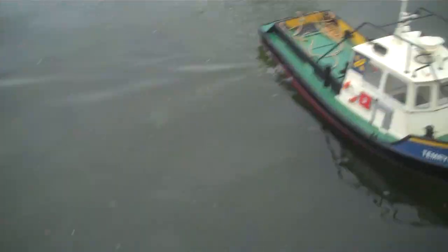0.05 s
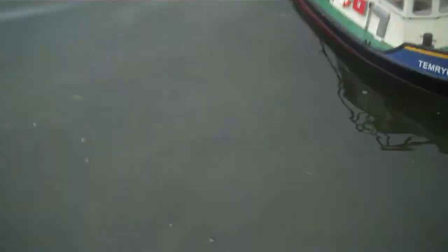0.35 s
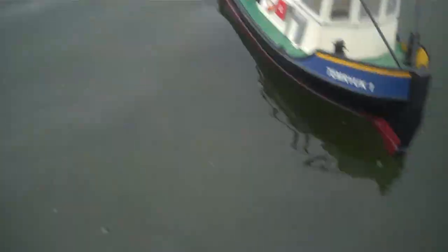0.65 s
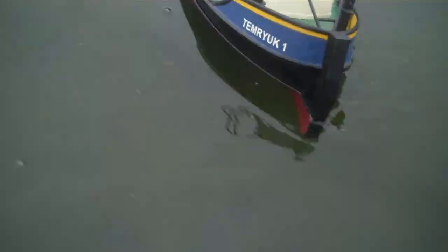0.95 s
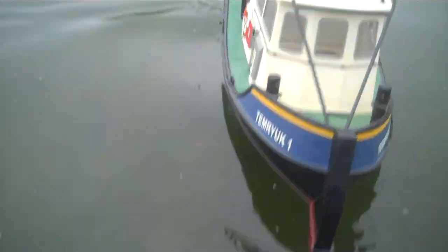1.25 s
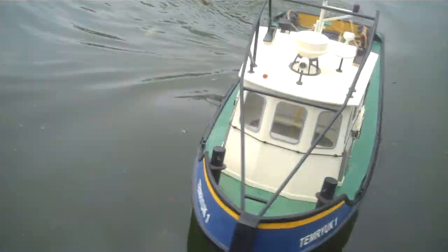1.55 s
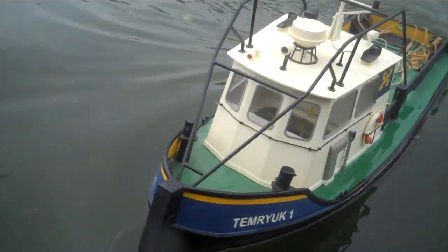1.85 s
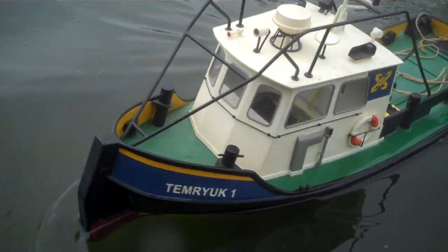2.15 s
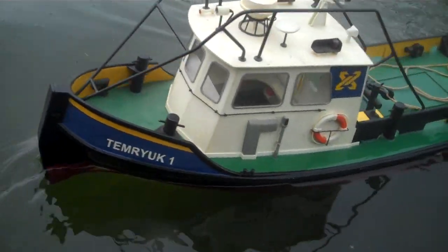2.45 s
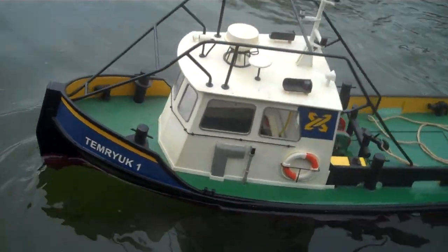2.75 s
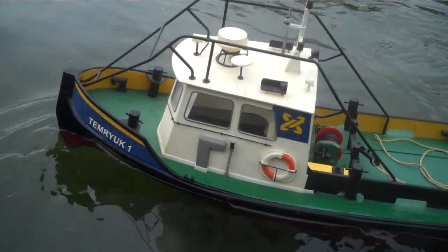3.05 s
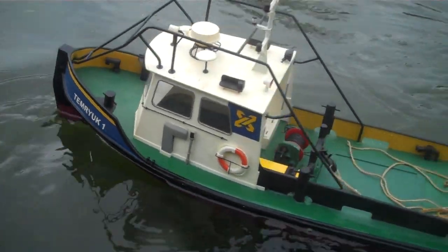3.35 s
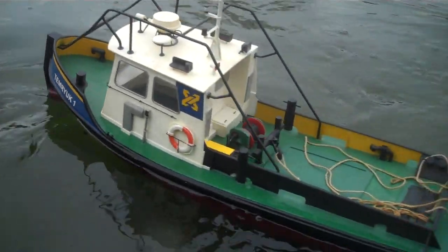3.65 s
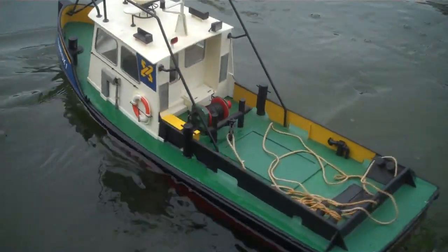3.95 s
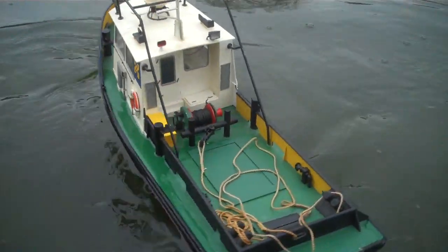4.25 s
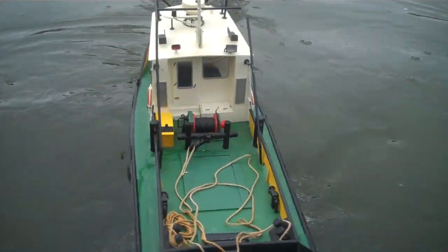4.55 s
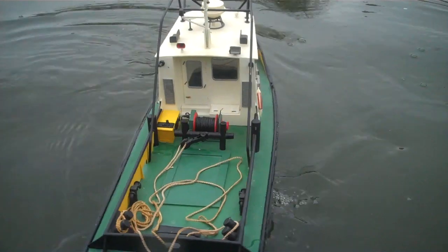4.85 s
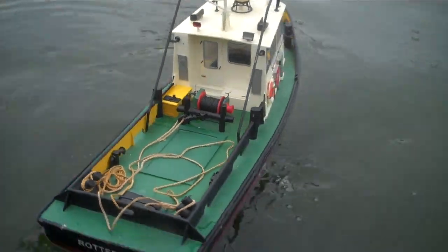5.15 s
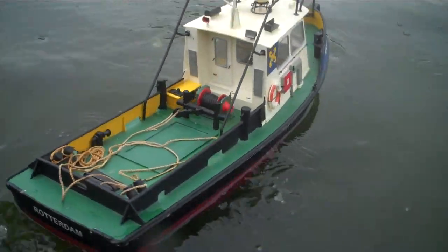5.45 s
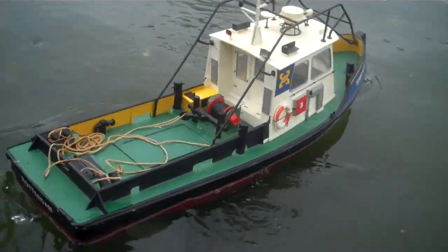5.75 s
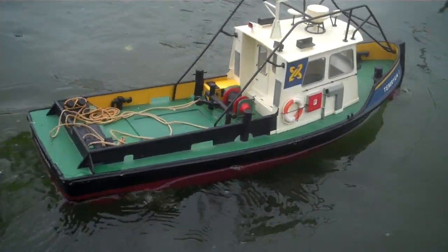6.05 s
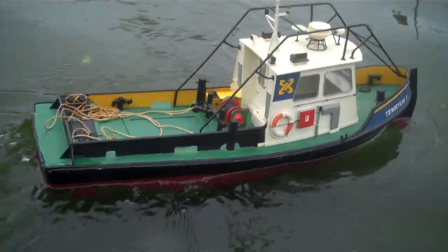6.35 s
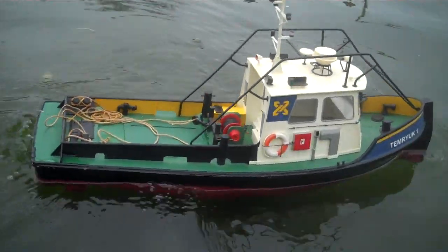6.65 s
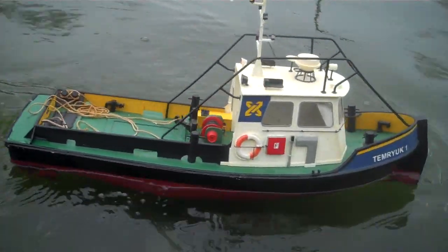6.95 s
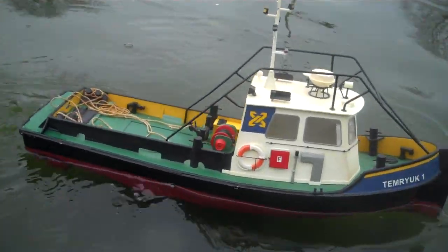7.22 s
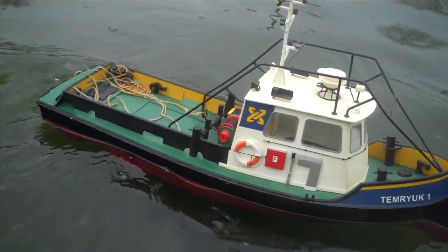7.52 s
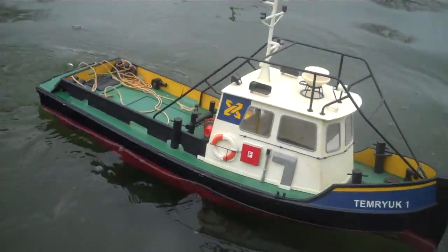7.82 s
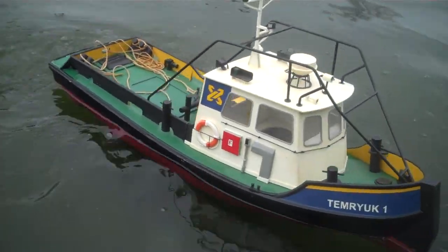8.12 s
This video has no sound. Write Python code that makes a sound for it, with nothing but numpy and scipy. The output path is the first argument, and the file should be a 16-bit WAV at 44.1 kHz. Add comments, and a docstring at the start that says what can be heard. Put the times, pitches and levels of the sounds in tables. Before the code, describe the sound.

A model tugboat runs close to a hand-held microphone on a lake for about eight seconds. Its electric motor hums faintly beneath a fast, ringing shaft rattle, hissing gears and a chattering dry bearing. The speed creeps up slightly and the tone shifts as the boat turns. During the first 1.5 seconds a hand rubs and bumps the microphone, with soft wind puffs and one hard crack at 0.3 seconds, the loudest moment. A brief swishing rub comes at 2.6 seconds. The shaft gives sharper slaps around 2.6 to 3.3 seconds and again from 6.2 to 6.5, and the bearing pings now and then. Handling knocks cluster at 3.7 to 3.9 seconds and at 4.6. Sharp drip-like ticks stand out near 4.3 and 5.7 seconds. A soft, low finger judder starts around 7.8 seconds. Quiet open air lies underneath throughout.

```python
"""A model tugboat circles on a lake, close to a hand-held camera.
Its electric motor hums and turns a rattling propeller shaft, which beats twice a turn and rings the
hull, deck and cabin; brushes and gears hiss, a dry bearing chatters. The tone shifts as the boat turns.
A hand rubs and knocks on the camera case, wind puffs on its two microphone ports, and a few drops
tick on the water, all over a low bed of open air."""
import sys
import numpy as np
from scipy import signal
from scipy.fft import rfft, irfft, next_fast_len
from scipy.io import wavfile
from scipy.ndimage import uniform_filter1d

SR = 44100
rng = np.random.default_rng(int(sys.argv[2]) if len(sys.argv) > 2 else 0)


def int16_out(signal):
    """Quantize to a 16-bit WAV file."""
    q = np.round(np.clip(np.atleast_2d(signal).T, -1, 1) * 32767)
    wavfile.write(sys.argv[1], SR, q.astype(np.int16))


N = 365148
TIME = np.arange(N) / SR

# tone of the air bed and of the wind puffs: freq_hz, gain_db
AIR_COLOUR = [(10, 2.5), (30, -3), (60, -5), (100, -11.5), (140, -8), (250, -15.5), (500, 1.5), (900, -19),
              (2000, -48), (6000, -18.5), (14000, -54)]
GUST_COLOUR = [(8, -3), (25, 0), (50, -3), (100, -14), (300, -21), (600, -50), (2000, -80)]
# wind puffs on the ports: start_s, length_s, level_db
GUSTS = [(.19, 0.13, -39.5), (.35, .08, -37), (.57, .13, -41), (.72, .06, -41), (.83, .09, -46),
         (.99, 0.095, -43.5), (1.27, 0.1, -44.5), (2.6, .07, -41)]
# sharp ticks of drops and of the case: start_s, level_db, centre_hz, width_hz, t60_s
TICKS = [(0.3418, -17, 7940, 5000, 0.015), (2.596, -29, 6650, 4000, 0.021), (2.643, -27, 4970, 4000, 0.026),
         (3.74, -24, 1500, 2200, .008), (3.746, -28, 2700, 400, .02), (3.793, -29, 1900, 1600, 0.011),
         (3.799, -27, 2500, 900, 0.051), (3.924, -28, 6940, 5000, .004), (1.689, -27, 4960, 400, 0.016),
         (4.917, -27, 5000, 4000, .006), (5.685, -18.5, 3620, 600, .02), (4.3246, -18, 4130, 1300, 0.019),
         (4.611, -24, 5900, 4000, 0.0055), (5.6853, -14, 5930, 2300, 0.012),
         (5.701, -24, 5430, 3500, 0.035), (5.718, -33, 6350, 4970, 0.079)]

# hand moves (slides, squeezes, one quick flick): start_s, length_s, level_db
RUBS = [(0, 0.29, -33), (.1, 0.14, -33), (.24, 0.14, -31), (.5, 0.18, -39.5), (.66, 0.11, -39),
        (.78, 0.38, -39), (1.22, 0.12, -44), (2.583, 0.079, -33.5), (3.66, 0.15, -44)]
GRIPS = [(0, 1.16, -37), (.19, 0.14, -62), (.54, 0.096, -38), (.82, 0.29, -45.5), (1.22, 0.26, -61),
         (2.56, 0.1, -38.5)]
FLICK = [(2.579, .088, -34.5)]
# tone of each kind of move: freq_hz, gain_db
RUB_COLOUR = [(200, -39), (450, 15), (850, 7.5), (1250, 6), (1800, 10), (2600, 7.5), (3500, -3),
              (4100, 7.5), (4900, 1), (5500, 0), (6100, 1), (7500, 0), (8700, -10), (9600, -9),
              (14000, -26)]
GRIP_COLOUR = [(10, 8), (35, 4), (70, 1.5), (150, 0), (280, 1), (430, 7.5), (580, -30), (900, -11),
               (3000, -60)]
FLICK_COLOUR = [(2000, -18), (3000, 5), (3600, 2), (4100, 3), (5400, -2), (6000, 7), (7400, -11),
                (8700, -21), (9900, -7), (11200, -26), (12600, -21), (14000, -24)]
# case resonances under a firm scrape, dry skin and a snap: pitch_hz, width_hz, gain_db
SCRAPE_MODES = [(432, 35, 13), (1314, 370, 10), (1810, 440, 3), (2600, 510, 8)]
RASP_MODES = [(4130, 570, -8), (4800, 400, -7), (4940, 300, 3), (6450, 440, -4)]
SNAP_MODES = [(610, 140, 6.5), (1260, 330, 2.5), (1600, 220, -2), (2350, 1240, -1), (4100, 400, 4),
              (5500, 870, -1), (7700, 2100, -11.5)]
# modes of the knocked case: pitch_hz, gain_db, base_t60_s
CASE_MODES = [(142, 4.5, 0.029), (245, 3, 0.018), (479.5, 5.5, 0.037), (685, 8, 0.017), (1184, 15.5, 0.013)]
# finger knocks: start_s, peak_db, brightness_hz, ring_factor
KNOCKS = [(0.3438, -7.5, 1370, 1.14), (0.459, -21.5, 420, 2.8), (0.494, -20, 865, 0.23),
          (0.582, -22.5, 400, 2.2), (.617, -28.5, 240, 1.1), (.72, -30, 300, 1.5), (.8, -27.5, 262, 0.96),
          (0.872, -29, 315, 1.3), (.917, -31, 420, 3.1), (0.966, -35, 232, 0.96),
          (1.3744, -12.5, 357, 1.95), (3.648, -26.5, 447, 0.27), (3.7, -28, 400, 0.67),
          (3.7042, -25, 1150, 0.7), (3.7388, -18, 325, 0.4), (3.7918, -20.5, 554, 0.45),
          (3.795, -24.5, 220, .7), (3.8946, -20, 1090, 1.7), (3.895, -12, 437, 0.72),
          (3.93, -16, 326, 0.26), (4.522, -30, 330, 1.8), (4.6105, -12.5, 573, 0.89),
          (4.653, -20, 600, 0.79), (5.648, -29.5, 298, 1.6), (5.802, -32.5, 203, 0.69),
          (5.976, -33.5, 215, 0.64), (6.681, -34.5, 187, 1.5)]

# shaft speed: time_s, turns_per_s
SHAFT_SPEED = [(0, 13.19), (1, 13.45), (1.7, 14.31), (2.3, 14.66), (2.8, 14.4), (3.3, 14.56), (4.2, 14.43),
               (4.7, 15.35), (5.05, 14.8), (5.35, 14.82), (6.1, 15.09), (6.7, 15.17), (7.1, 15.53),
               (7.6, 15.2), (8.28, 15.09)]
# side the boat shows us (0 bow, 90 port, 180 stern, 270 starboard): time_s, angle_deg
VIEW_ANGLE = [(0, -45), (1.4, 0), (2.7, 90), (4.65, 180), (6.8, 270), (8.28, 312)]
# partials of the motor hum and of the drone in the hull: harmonic, gain_db
MOTOR_PARTIALS = [(4, 1), (6, -5), (8, -2.5), (9, 0), (12, 3), (15, -2.5), (18, 2.5), (24, -14)]
DRONE_PARTIALS = [(1, 1.5), (2, -10), (3, -8), (4, 1.5), (5, 1.5)]
# the six contacts in one turn of the coupling: strength_db
CONTACTS_DB = [17, -16, 11.5, 14.5, -21, -17]
# how hard the shaft beats in its tube: time_s, level_db
BEAT_LEVEL = [(0, -42), (1.6, -35), (2.1, -31.5), (3.1, -29.5), (3.8, -36), (4.3, -29.5), (4.7, -31),
              (5.6, -36), (6.3, -28), (6.7, -31), (7.2, -32), (7.6, -38), (8.28, -34)]
# accents (hard shaft slaps, dry bearing pings): start_s, level_db
SLAPS = [(2.641, -27), (2.767, -25), (2.837, -26), (3.008, -23.5), (3.108, -31), (3.316, -28), (4.212, -29),
         (4.352, -31), (5.25, -33), (6.182, -31), (6.254, -23), (6.29, -31), (6.322, -30), (6.518, -29)]
PINGS = [(1.288, -30), (1.324, -32), (1.396, -27), (2.34, -27), (2.501, -33), (2.857, -26), (3.137, -31),
         (3.262, -33), (4.547, -29), (4.57, -33), (5.644, -29)]
# swells of bearing whirr: start_s, length_s, level_db
WHIRRS = [(.77, 0.14, -35.5), (1.05, 0.93, -49), (1.7, 0.23, -50), (2.2, 0.24, -39), (2.7, 0.91, -44),
          (4.02, 0.16, -40), (4.42, 0.25, -41.5), (5.57, 0.21, -38.5), (6.08, 0.22, -46)]
# resonances of the boat's parts: pitch_hz, width_hz, gain_db
HULL_MODES = [(456.4, 83, 2.5), (538, 220, -9), (300, 230, -10.5), (168, 59, -5.5), (72, 51, -13.5)]
SIDE_MODES = [(695, 107, 0)]
DECK_MODES = [(1148, 89, -3.5), (1251, 133, 1.1), (1366.4, 59, -0.5)]
DECK_MAIN_MODE = [(1272, 120, 0)]
CABIN_MODES = [(2224, 180, 10), (2404, 190, 9), (1910, 273, 0), (2640, 230, 2.5)]
WELL_MODES = [(1472, 230, -0.5), (1638, 68, 2), (2000, 285, -0.5), (2702, 230, 1), (3040, 465, -7)]
GEAR_MODES = [(3100, 2770, 6), (4780, 1020, 6), (6230, 970, -1), (7460, 1000, -6), (7880, 3300, -9.5),
              (11900, 6200, -18)]
BEARING_MODES = [(2309, 105, -6), (2458, 140, -15)]
# directions in which each part plays louder or softer: angle_deg, half_width_deg, gain_db
MOTOR_LOBES = [(180, 21, 3), (300, 24, 0.85)]
DRONE_LOBES = [(242, 46, 10)]
HULL_LOBES = [(136, 15, 6), (240, 25, 0.5), (279, 11, -4.5)]
SIDE_LOBES = [(41.4, 8.6, 4.5), (226, 10, 3.5), (291, 29, -4)]
DECK_LOBES = [(86.6, 18, 5), (162.4, 2.3, 3), (205, 37, -2.5), (276, 99, 3.5)]
CABIN_LOBES = [(-3, 20, 4.5), (63, 39, 4.5), (192, 69, 1.5), (273, 20, -4)]
WELL_LOBES = [(148, 12, 5.2), (225, 6.4, 4.8), (277, 55, 4.9)]
GEAR_LOBES = [(-17.5, 17.4, 5.5), (51, 12, -1.5), (149.5, 7.3, 2.5), (233, 7.3, 1)]
# drift of the cabin's ring from its usual pitch: time_s, shift_hz
CABIN_SHIFT = [(.9, 59.5), (1.4, -83), (2.2, 0.5), (3.1, -40), (3.8, 70), (4.5, 25.5), (6.2, 99.5),
               (6.8, -33), (7.9, 278)]
# narrow bands, each heard over one range of view angle: the boat's small panels, and first a thin high rasp of
# the hand rubbing the case near 0.9 s: pitch_hz, width_hz, level_db, angle_deg, spread_deg
NARROW_BANDS = [(4770, 260, -50, -17, 7.1), (3215, 400, -49, 143, 87), (5200, 210, -54, 202, 51),
                (3440, 680, -45.5, 250, 23), (4640, 190, -50, 255, 14), (3150, 510, -46, 291.5, 3.8),
                (1535, 240, -41.5, 295, 12), (2780, 190, -48, 237, 9.8), (2690, 380, -47.5, 299, 20),
                (1927, 100, -47, 290, 17), (2130, 130, -47.5, 294, 32), (6600, 300, -64, 225, 30),
                (7400, 400, -69, 228, 92)]


def from_db(db):
    return 10 ** (np.asarray(db) / 20)


def unit_rms(x):
    return x / np.sqrt(np.mean(x ** 2) + 1e-20)


def unit_peak(x):
    return x / abs(x).max()


def pan(left_db, right_db):
    return from_db([[left_db], [right_db]])


def follow(curve):
    """An automation curve, read at every sample."""
    return np.interp(TIME, *np.transpose(curve))


def add(mix, start_s, sound):
    """Lays a sound into the mix."""
    span = mix[..., round(start_s * SR):][..., :sound.shape[-1]]
    span += sound[..., :span.shape[-1]]


def wander(rate_hz):
    """Smooth random modulation of unit size, rolling off above the given rate."""
    coarse_s = np.arange(next_fast_len(N // 32 + 1)) * 32 / SR
    hz = np.fft.rfftfreq(len(coarse_s), coarse_s[1])
    spectrum = rfft(rng.standard_normal(len(coarse_s))) / (1 + (hz / rate_hz) ** 4)
    return np.interp(TIME, coarse_s, unit_rms(irfft(spectrum, len(coarse_s))))


def stereo_noise(likeness):
    """White noise at the two ports: likeness 0 is wide, 1 is mono."""
    left, other = rng.standard_normal((2, N))
    return np.array([left, likeness * left + np.sqrt(1 - likeness ** 2) * other])


def coloured(x, colour):
    """Shapes a signal with an EQ curve, at unit RMS."""
    points_hz, db = np.transpose(colour)
    hz = np.fft.rfftfreq(N, 1 / SR)
    gain = from_db(np.interp(np.log(hz + 1), np.log(points_hz), db))
    return unit_rms(irfft(rfft(x) * gain, N))


def ring(modes, size=4096):
    """Minimum-phase impulse response of steep-sided resonances."""
    hz = abs(np.fft.fftfreq(size, 1 / SR))
    power = sum(from_db(db) ** 2 / (1 + ((hz - f) / width) ** 2 * 2) ** 3 for f, width, db in modes)
    log_gain = np.log(power + 1e-9) / 2
    return np.fft.ifft(np.exp(np.conj(signal.hilbert(log_gain)))).real[:size // 2]


def resonate(x, modes):
    """Plays a stereo signal through resonances, at unit RMS."""
    return unit_rms(signal.oaconvolve(x, ring(modes)[None], axes=1)[:, :N])


def shifted(x, shift_hz):
    """Slides a ring up or down in frequency."""
    analytic = signal.hilbert(x, next_fast_len(N))[:, :N]
    return (analytic * np.exp(2j * np.pi * np.cumsum(shift_hz) / SR)).real


def swells(rows, skew, point):
    """One arched envelope a row; skew above 1 peaks late, a higher point sharpens the top."""
    envelope = np.zeros(N)
    for start_s, length_s, db in rows:
        progress = np.linspace(0, 1, round(length_s * SR))
        add(envelope, start_s, from_db(db) * abs(np.sin(np.pi * progress ** skew)) ** point)
    return envelope


def hits(rows, modes):
    """Single hard blows, each left to ring out."""
    out, response = np.zeros(N), unit_peak(ring(modes))
    for start_s, db in rows:
        add(out, start_s, from_db(db) * response)
    return out


def air(level_db=-51):
    """Low, steady open-air wash over the lake."""
    return from_db(level_db) * coloured(stereo_noise(0.91), AIR_COLOUR)


def gusts():
    """Puffs of wind thud softly on the ports."""
    return coloured(stereo_noise(1), GUST_COLOUR) * swells(GUSTS, skew=0.67, point=0.55) * pan(-2.5, 1.5)


def ticks():
    """Drops and the case tick: an impulse with a tiny noise tail, different at each port."""
    out, t = np.zeros((2, N)), np.arange(SR // 30) / SR
    for start_s, db, hz, width_hz, t60_s in TICKS:
        burst = 0.41 * rng.standard_normal((2, len(t))) * from_db(-60 * t / t60_s)
        burst[:, 0] += 1.5
        tick = signal.fftconvolve(burst, ring([(hz, width_hz, 0)])[None], axes=1)
        add(out, start_s, from_db(db) * unit_peak(tick))
    return out * pan(2, -4)


def hand_rub(grain_db=1.5, grit_db=3, lumps_db=3.5, fleck_db=4.5, firm_db=-29, light_db=-38):
    """Skin slides over the case with a grainy hiss while the grip rumbles through it."""
    slide = stereo_noise(0.3) * from_db(grain_db * wander(200))
    pressure = swells(RUBS, skew=1.4, point=1.1)
    hiss = coloured(slide, RUB_COLOUR) * pressure * from_db(-2)
    grit = slide * from_db(grit_db * wander(400))
    # the case's resonances grow faster than the hiss as the hand presses harder
    scrape = resonate(grit, SCRAPE_MODES) * pressure ** 2 / from_db(firm_db)
    grip = from_db(-60) + swells(GRIPS, skew=0.85, point=0.6)  # the hand never quite lets go
    lumps = stereo_noise(0.99) * from_db(lumps_db * wander(18))
    rumble = coloured(lumps, GRIP_COLOUR) * grip
    flecks = stereo_noise(0.26) * from_db(fleck_db * wander(70))
    rasp = resonate(flecks, RASP_MODES) * np.minimum(pressure, from_db(light_db)) * from_db(-8)
    return hiss + rasp + scrape + rumble


def finger_flick(grain_db=2):
    """A fingertip flicks across the case with a bright swish."""
    grains = stereo_noise(0.23) * from_db(-grain_db * wander(300))
    return coloured(grains, FLICK_COLOUR) * swells(FLICK, skew=1.15, point=0.9) * pan(1, -1)


def knock(peak_db, bright_hz, ring_factor):
    """A soft fingertip reaches only the low modes of the case; a hard blow rings them all."""
    t = np.arange(SR // 8) / SR
    body = sum(from_db(db - 60 * t / (t60_s * ring_factor)) * np.sin(2 * np.pi * hz * t)
               for hz, db, t60_s in CASE_MODES)
    body = signal.lfilter(*signal.butter(4, 1.4 * bright_hz, fs=SR), body)
    hollow_note = ring_factor * signal.lfilter(*signal.iirpeak(bright_hz, 3, fs=SR), body)
    low_cut = signal.butter(2, 110, "high", fs=SR)  # the knocks carry no deep bass
    return from_db(peak_db) * unit_peak(signal.lfilter(*low_cut, body + hollow_note))


def finger_knocks():
    """Fingers bump the camera case."""
    out = np.zeros(N)
    for start_s, peak_db, bright_hz, ring_factor in KNOCKS:
        add(out, start_s, knock(peak_db, bright_hz, ring_factor))
    return out


def finger_judder(start_s=7.766, gap_s=0.0175, slowing_s=0.00069, jitter_s=0.0017, slips=19):
    """A finger judders over the case, building up and sticking a little longer before each slip."""
    out = np.zeros(N)
    for k, (late, strong) in enumerate(rng.standard_normal((slips, 2))):
        slip_s = start_s + k * gap_s + slowing_s * k ** 2 / 2 + jitter_s * late
        fade_in = 1 - np.exp(-(k + 1) / 4.5)
        add(out, slip_s, fade_in * knock(-31 + 1.5 * strong, bright_hz=213, ring_factor=0.64))
    return out


def case_snap(start_s=0.3418, level_db=-0.5):
    """The stiff shell gives under the grip with one hard crack, close to the left port."""
    return hits([(start_s, level_db)], SNAP_MODES) * pan(3.5, -3.5)


def facing(base_db, lobes):
    """Level ride of a part, in dB, as its lobes sweep past the camera."""
    around = np.arange(360)
    pattern_db = sum(db * np.exp(-(((around - angle + 180) % 360 - 180) / width) ** 2)
                     for angle, width, db in lobes)
    return base_db + np.interp(follow(VIEW_ANGLE), around, pattern_db, period=360)


def hum(hz, partials, level_db, waver, flutter_db):
    """Harmonics that waver together in pitch and flutter separately in level."""
    phase = 2 * np.pi * np.cumsum(hz * (1 + waver * wander(12.4))) / SR
    tone = sum(from_db(db + flutter_db * wander(9.8)) * np.sin(k * phase) for k, db in partials)
    return unit_rms(tone) * from_db(level_db)


def motor_and_drone(gear_ratio=2, drone_hz=132.9):
    """The motor's hum follows its speed, beside a steadier drone from inside the hull."""
    motor_hz = gear_ratio * follow(SHAFT_SPEED)
    motor = hum(motor_hz, MOTOR_PARTIALS, facing(-55.5, MOTOR_LOBES), waver=0.0021, flutter_db=4.5)
    drone = hum(drone_hz, DRONE_PARTIALS, facing(-62.5, DRONE_LOBES), waver=0.0012, flutter_db=1)
    return motor + drone


def narrow_buzz(force, struck=0.15, fleck_db=3.5):
    """Each narrow band buzzes in its own short flecks, fading in as its angle comes round: the boat's small
    panels, and a thin high rasp of the hand on the case near the start."""
    view_deg, out = follow(VIEW_ANGLE), np.zeros((2, N))
    drive = stereo_noise(0.24) * np.sqrt(1 - struck + struck * force ** 2)
    for hz, width_hz, db, angle_deg, spread_deg in NARROW_BANDS:
        band = signal.iirpeak(hz, hz / width_hz, fs=SR)
        flecks = drive * from_db(fleck_db * wander(58))
        buzz = unit_rms(signal.lfilter(*band, signal.lfilter(*band, flecks)))
        out += buzz * from_db(db) * np.exp(-((view_deg - angle_deg) / spread_deg) ** 2 / 2)
    return out


def bearing_pings():
    """Now and then the dry bearing rings out with a loud ping."""
    return hits(PINGS, BEARING_MODES) * pan(-1.6, 1.4)


def bearing_chatter(turns, balls=6, play=0.2, scatter_db=4):
    """The balls of the bearing catch unevenly, and each catch rings the cabin."""
    count = np.maximum.accumulate(np.floor(balls * turns + play * wander(50)))
    at = np.flatnonzero(np.diff(count) > 0)
    accent_db = scatter_db * np.clip(rng.standard_normal(N)[at], -2, 1.7)
    catches = np.zeros(N)
    catches[at] = from_db(facing(-40.5, CABIN_LOBES)[at] + accent_db)
    return signal.oaconvolve(catches, unit_peak(ring(CABIN_MODES)))[:N] * pan(-1.2, 1.2)


def deck_glide(x, hz_per_deg=0.26, neutral_deg=170):
    """The deck's ring rises evenly as the boat comes round."""
    return shifted(x, hz_per_deg * (follow(VIEW_ANGLE) - neutral_deg))


def shaft_slaps():
    """The shaft slaps hard in its tube and rings the deck's main mode."""
    return deck_glide(hits(SLAPS, DECK_MAIN_MODE) * pan(-1.6, 1.4))


def shaft_beats(turns, scatter_db=1.8):
    """Twice a turn the shaft bumps its tube, and the deck rings with each bump."""
    at = np.flatnonzero(np.diff(np.floor(2 * turns)) > 0)
    accent_db = scatter_db * np.clip(rng.standard_normal(len(at)), -2, 1)
    bumps = np.zeros(N)
    bumps[at] = from_db(follow(BEAT_LEVEL)[at] + accent_db)
    return signal.oaconvolve(bumps, unit_peak(ring(DECK_MAIN_MODE)))[:N] * pan(-1.6, 1.4)


def coupling_rattle(turns, scatter_db=3.5, contact_s=0.0014, play=0.15):
    """The loose coupling strikes six times a turn, unevenly; each strike is a brief burst of force."""
    contacts = len(CONTACTS_DB)
    count = np.maximum.accumulate(np.floor(turns * contacts + play * wander(50))).astype(int)
    at = np.flatnonzero(np.diff(count) > 0)
    accent_db = scatter_db * np.clip(rng.standard_normal(N)[at], -2, 2)
    strikes = np.zeros(N)
    strikes[at] = from_db(np.take(CONTACTS_DB, count[at] % contacts) + accent_db)
    force = signal.lfilter([1], [1, -np.exp(-1 / (contact_s * SR))], strikes)
    return unit_rms(uniform_filter1d(force, size=130))  # grease softens each strike


def boat_part(force, modes, level_db, struck, likeness, left_db, phase_rad, uneven_db=1):
    """Strikes and sliding friction ring one part; struck is the strikes' share of the power."""
    felt = unit_rms(force * from_db(uneven_db * wander(45)))
    drive = stereo_noise(likeness) * np.sqrt(1 - struck + struck * felt ** 2)
    response = signal.hilbert(ring(modes))
    ports = np.array([response.real, (response * np.exp(1j * phase_rad)).real])
    sound = unit_rms(signal.oaconvolve(drive, ports, axes=1)[:, :N])
    return sound * from_db(level_db) * pan(left_db / 2, -left_db / 2)


def tugboat(throb_db=1.6):
    """One rattling shaft drives every part of the boat, each with its own voice and direction; a thin rasp of
    the hand on the case rides along with the panels."""
    turns = np.cumsum(follow(SHAFT_SPEED)) / SR
    force = coupling_rattle(turns)
    hull = boat_part(force, HULL_MODES, facing(-50, HULL_LOBES),
                     struck=0.24, likeness=1, left_db=1, phase_rad=0.03)
    sides = boat_part(force, SIDE_MODES, facing(-49.5, SIDE_LOBES),
                      struck=0.1, likeness=0.82, left_db=-0.5, phase_rad=0.05)
    deck = boat_part(force, DECK_MODES, facing(-41.5, DECK_LOBES),
                     struck=0.088, likeness=0.93, left_db=-3.5, phase_rad=0.34)
    deck = deck_glide(deck + shaft_beats(turns))
    cabin = boat_part(force, CABIN_MODES, facing(-44.5, CABIN_LOBES),
                      struck=0.16, likeness=0.86, left_db=-2.5, phase_rad=0.19)
    throb = unit_rms(from_db(throb_db * np.clip(wander(42), -2, 1.5)))  # the load on the shaft varies
    cabin = shifted(cabin * throb + bearing_chatter(turns), follow(CABIN_SHIFT))
    well = boat_part(force, WELL_MODES, facing(-45, WELL_LOBES),
                     struck=0.22, likeness=0.14, left_db=0.5, phase_rad=0.09)
    gears = boat_part(force, GEAR_MODES, facing(-44.5, GEAR_LOBES),
                      struck=0.1, likeness=0.02, left_db=2, phase_rad=0.019)
    whirr = boat_part(force, BEARING_MODES, 0, struck=0.12, likeness=0.76, left_db=-1, phase_rad=0.19)
    whirr *= swells(WHIRRS, skew=0.99, point=1)
    return hull + sides + deck + cabin + whirr + well + gears + narrow_buzz(force)


def scene():
    """The boat and close handling noise, over ticks, wind and open air."""
    boat = tugboat() + motor_and_drone() + shaft_slaps() + bearing_pings()
    handling = finger_knocks() + case_snap() + finger_judder() + hand_rub() + finger_flick()
    return boat + handling + ticks() + gusts() + air()


def ducked(x, threshold_db=-22, share=0.27, recovery_db_per_s=35, attack_s=0.029):
    """Gain control: a loud blow turns everything down by a share of its overshoot."""
    power_db = 10 * np.log10(abs(uniform_filter1d((x ** 2).mean(0), size=200)) + 1e-12)
    fall_db = TIME * recovery_db_per_s
    held_db = np.maximum.accumulate(power_db + fall_db) - fall_db
    over_db = np.maximum(held_db - threshold_db, 0)
    pole = np.exp(-1 / (attack_s * SR))
    return x / from_db(share * signal.lfilter([1 - pole], [1, -pole], over_db))


def record(dry, cutoff_hz=14300):
    """Gain control, a hard ceiling at full scale, then a steep high cut."""
    high_cut = signal.firwin(511, cutoff_hz, window=("kaiser", 9), fs=SR)
    return signal.oaconvolve(np.clip(ducked(dry), -1, 1), high_cut[None], "same")


dry = scene()
out = record(dry)
int16_out(out)
```